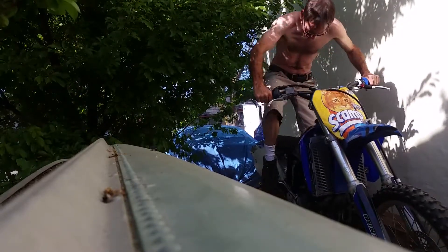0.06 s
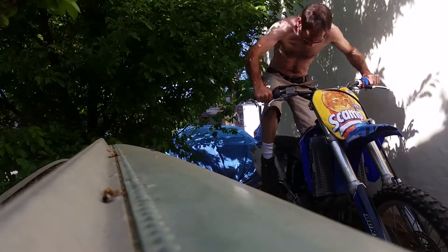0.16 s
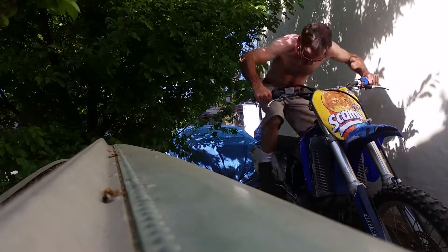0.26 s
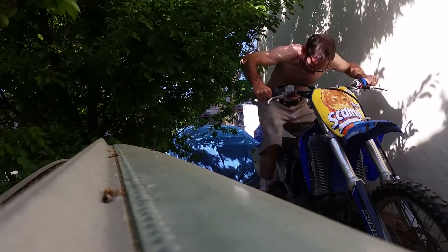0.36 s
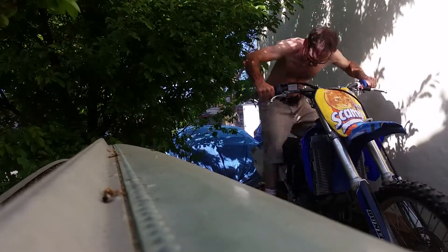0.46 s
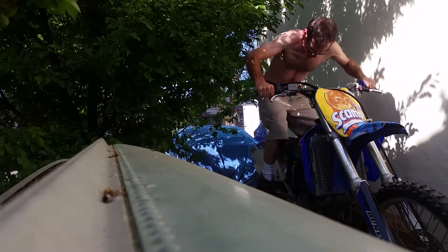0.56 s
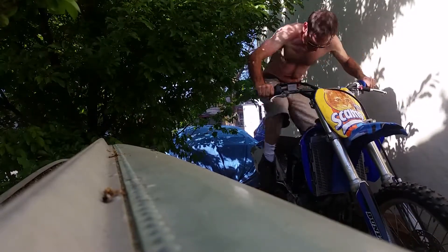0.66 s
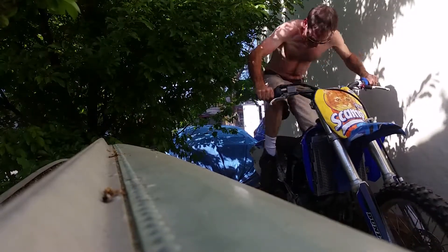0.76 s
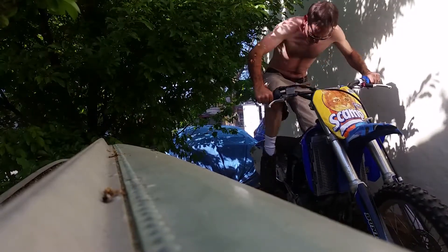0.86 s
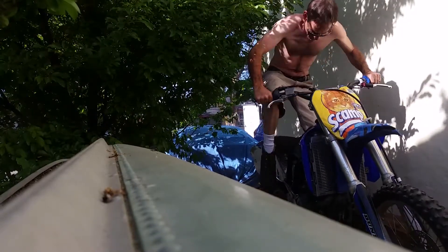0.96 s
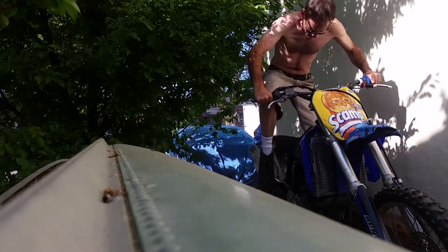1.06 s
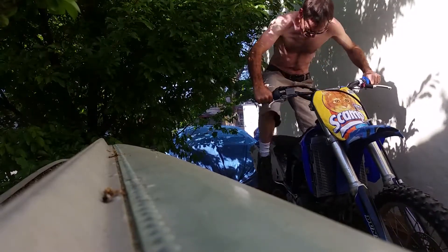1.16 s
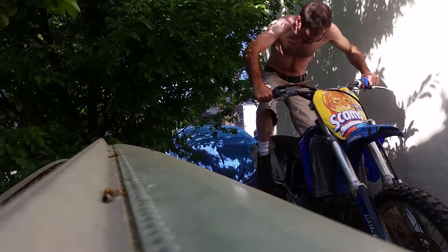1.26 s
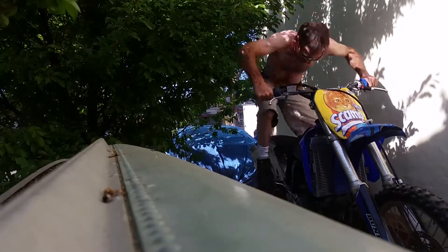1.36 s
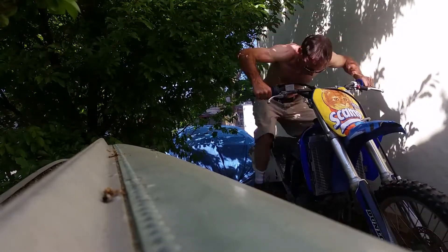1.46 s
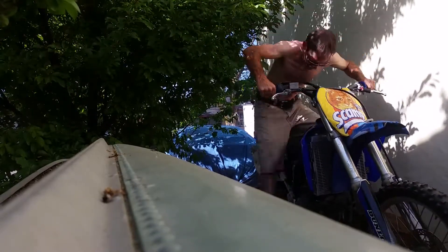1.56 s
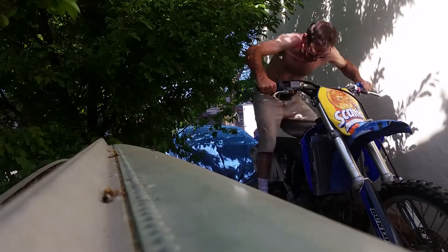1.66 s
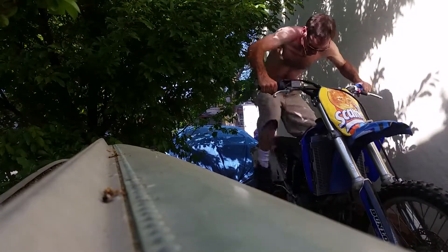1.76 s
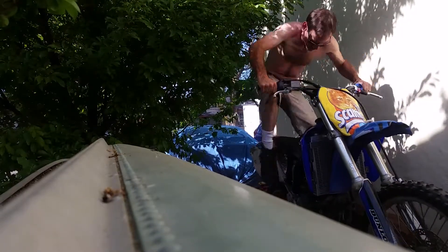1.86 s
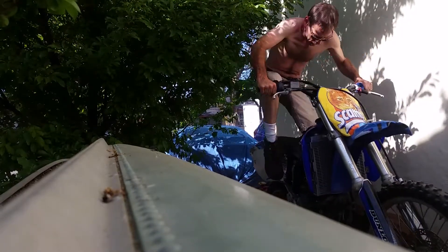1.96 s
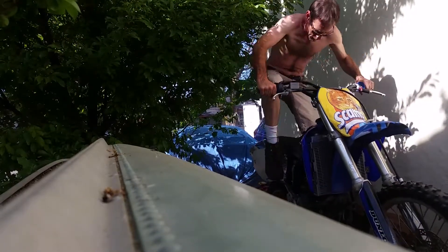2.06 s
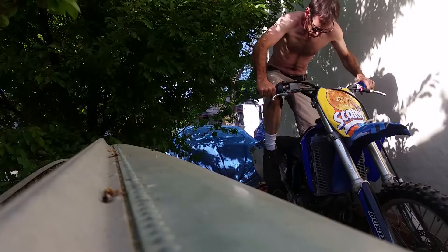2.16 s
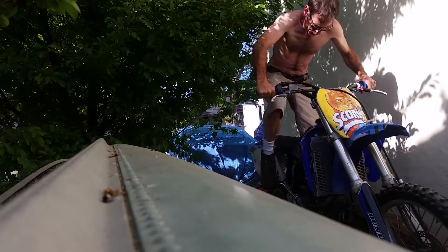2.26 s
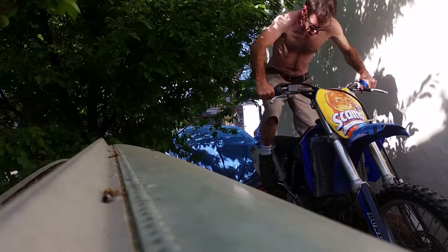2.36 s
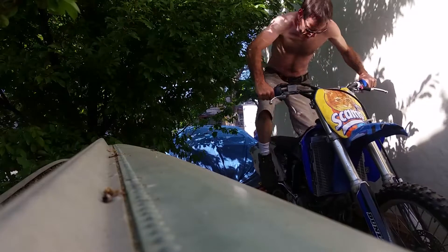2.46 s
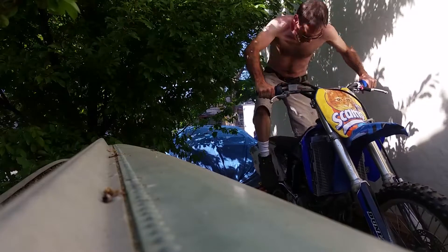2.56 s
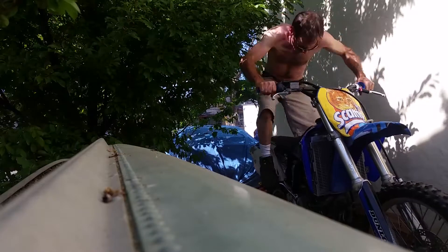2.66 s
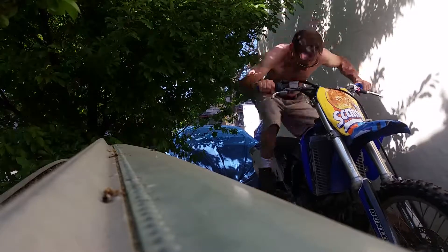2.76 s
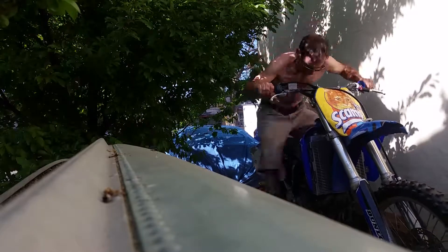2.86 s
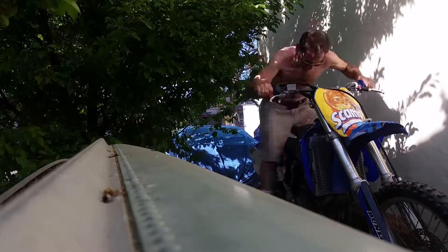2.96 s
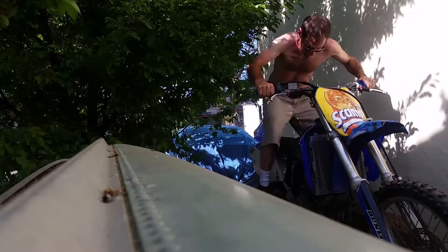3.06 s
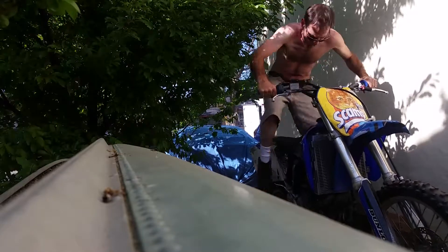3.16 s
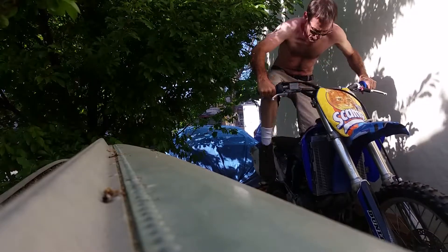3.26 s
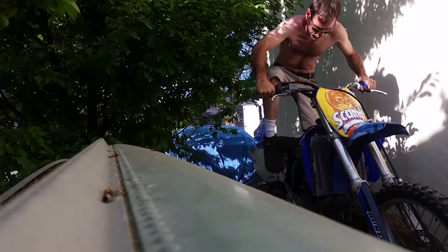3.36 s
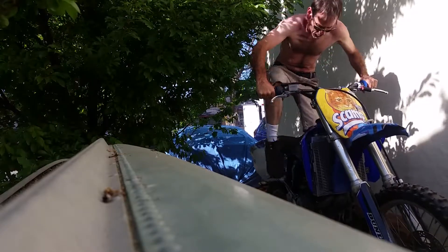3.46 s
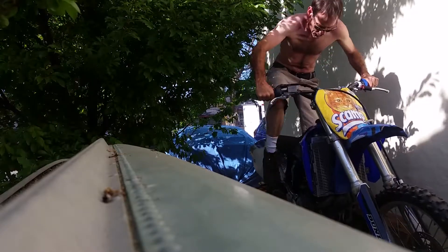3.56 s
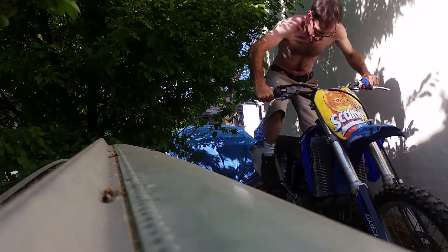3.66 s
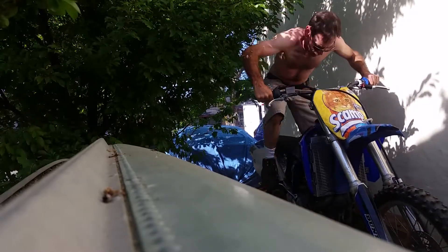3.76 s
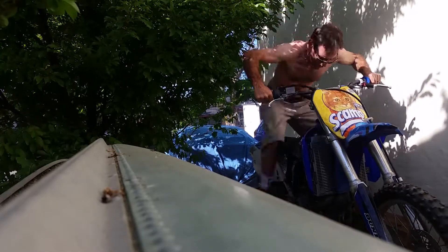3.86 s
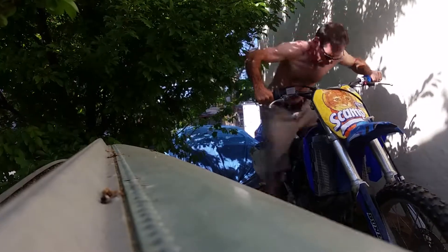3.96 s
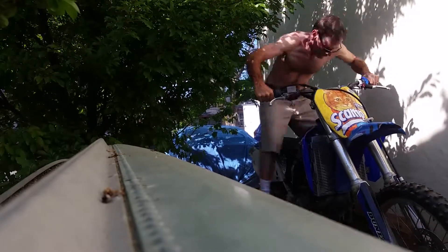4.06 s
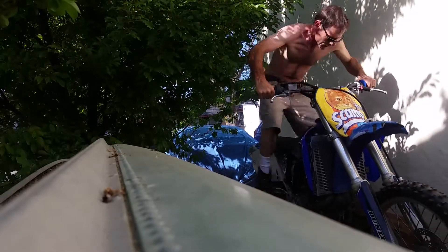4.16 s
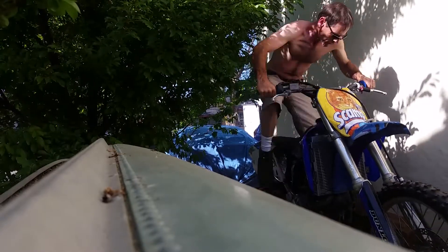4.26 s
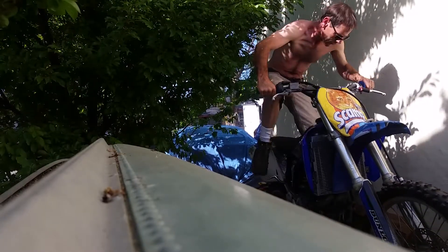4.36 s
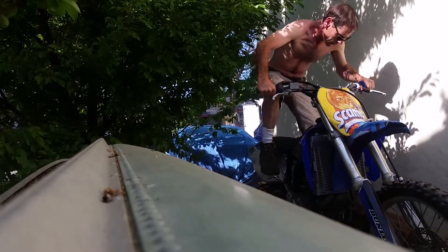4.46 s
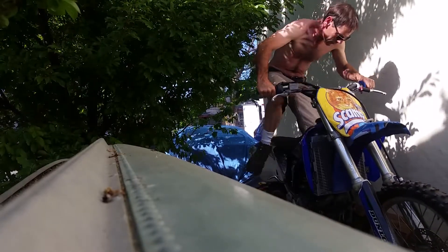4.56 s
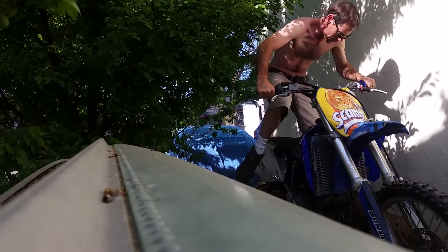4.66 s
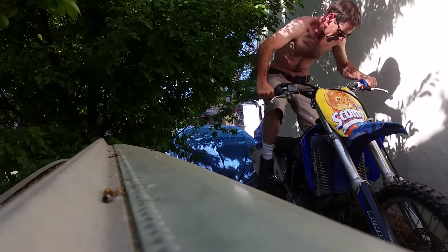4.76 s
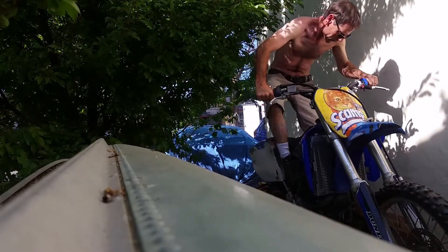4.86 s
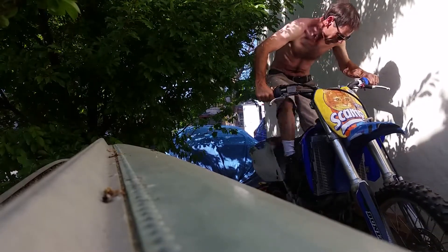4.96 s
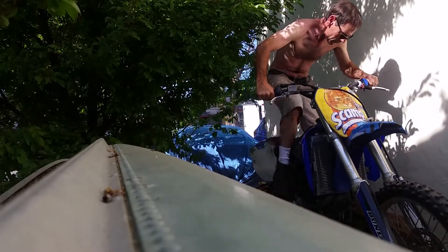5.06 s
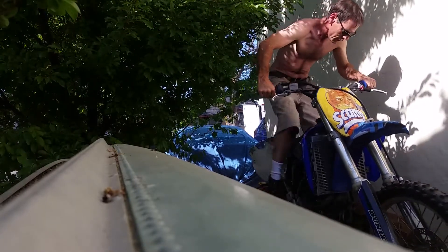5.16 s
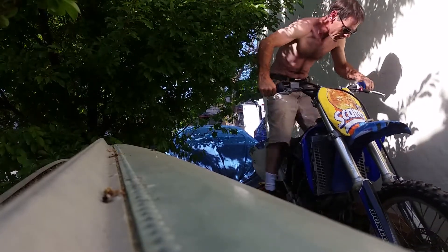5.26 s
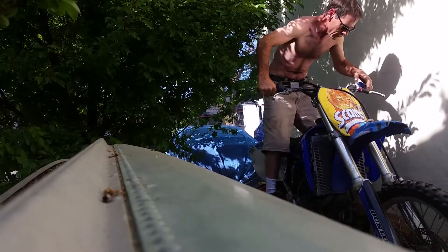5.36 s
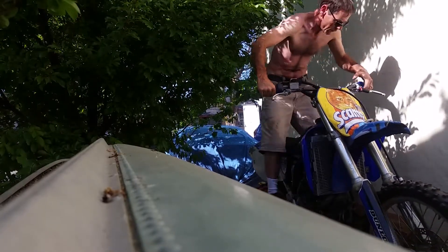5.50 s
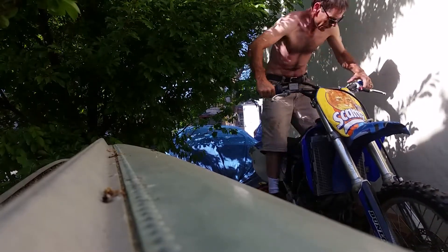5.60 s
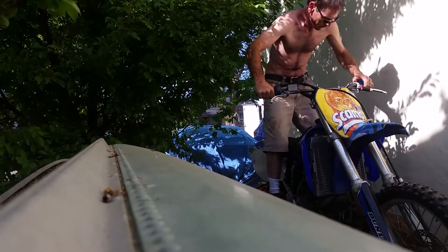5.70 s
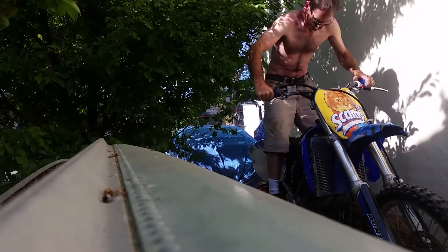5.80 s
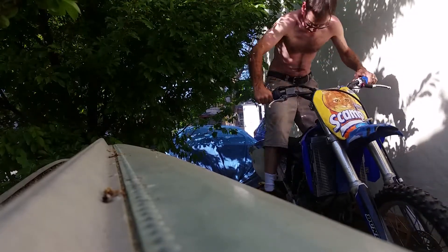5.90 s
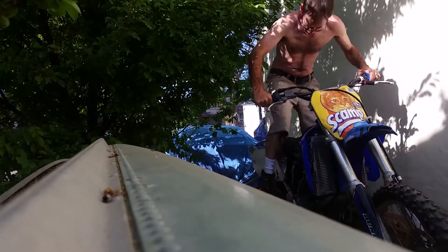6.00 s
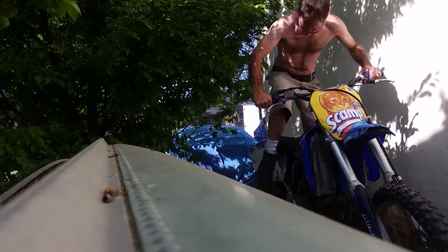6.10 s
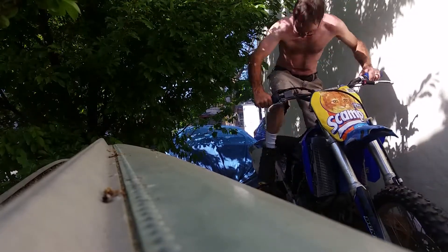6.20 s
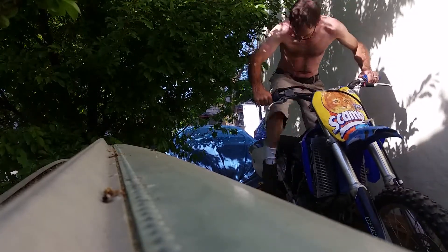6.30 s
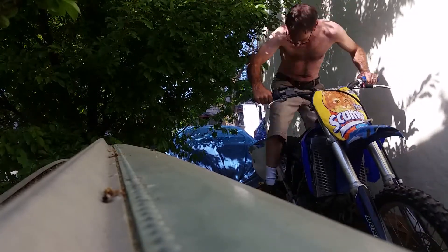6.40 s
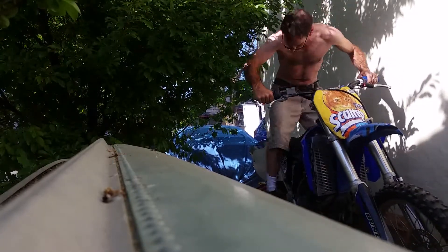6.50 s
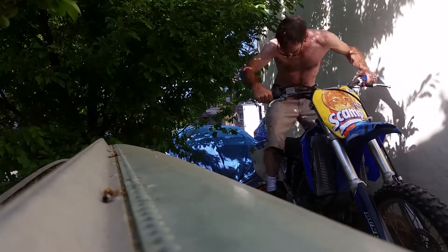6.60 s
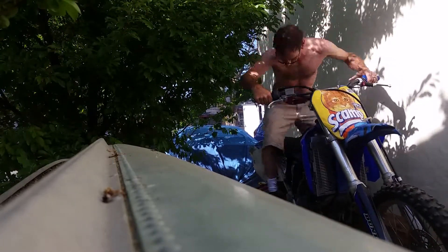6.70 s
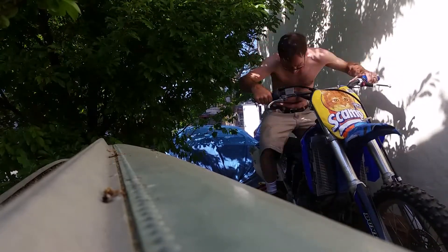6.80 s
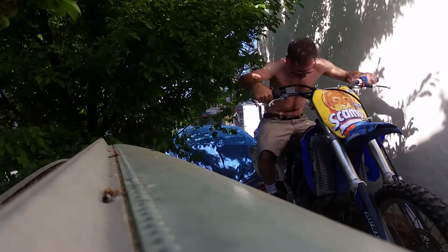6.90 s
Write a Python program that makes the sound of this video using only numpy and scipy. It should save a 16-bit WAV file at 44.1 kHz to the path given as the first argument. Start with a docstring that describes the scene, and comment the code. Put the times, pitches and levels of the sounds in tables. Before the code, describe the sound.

A motorcycle at the right of a leafy yard is kicked over and fails to start. Each kick brings a metallic clack, low hollow exhaust puffs and a short gear whirr, then quick ratchet clicks as the lever returns. The first two strokes are strongest, later ones weaker, and the fifth slips with only a knock. Distant traffic and faint insects fill the gaps. Close stereo microphone, short reflections from a wall.

```python
"""Motorcycle kicked over in a yard

A single-cylinder motorcycle is kicked over four times in a leafy yard and does not start; a fifth try slips.
Each stroke puffs air into the exhaust pipe, which rings low and dies away. Bursts of noise
make the whirr of the starter gears and the ratchet clicks as the lever returns, and ringing tones make the
knocks of boot and lever on the frame. Shaped noise gives far traffic, insects and leaves."""
import sys
import numpy as np
from scipy import signal
from scipy.fft import rfft, irfft, next_fast_len
from scipy.io import wavfile

SR = 44100
rng = np.random.default_rng(int(sys.argv[2]) if len(sys.argv) > 2 else 0)


def digitize_waveform(pressure):
    """Quantize a signal to 16-bit integers and store it at the path in sys.argv[1].

    Rows of a 2-D input are taken as channels; values are limited to [-1, 1].
    """
    field = np.atleast_2d(pressure).T
    bounded = np.clip(field, -1, 1)
    quanta = np.round(bounded * 32767).astype(np.int16)
    wavfile.write(sys.argv[1], SR, quanta)


N = 306048   # length in samples
SIZE = 2 * next_fast_len(N // 2 + 4096)   # FFT length in samples, with room for echoes
HZ = np.arange(1, SIZE // 2 + 2) * SR / SIZE   # FFT grid; starts one step above zero so its log exists


def amp(db):
    """Decibels to gain."""
    return 10 ** (np.asarray(db) / 20)


def rms_one(x):
    """Scale to unit rms."""
    return x / np.sqrt(np.mean(x ** 2) + 1e-20)


def at_hz(points):
    """Read a table on the FFT grid, along a logarithmic pitch axis."""
    hz, value = np.transpose(points)
    return np.interp(np.log(HZ), np.log(hz), value)


def levels(rows):
    """Gains over time from the dB columns of a curve."""
    s, *columns = np.transpose(rows)
    t = np.arange(N) / SR
    return np.array([amp(np.interp(t, s, column)) for column in columns])


def drift(rate):
    """Slow random wander: straight lines between random points, 'rate' points per second."""
    knots = rng.standard_normal(int(N / SR * 60) + 2)
    position = np.arange(N) / SR * np.clip(rate, .1, 59)
    return np.interp(position, np.arange(len(knots)), knots)


def ring(clicks, hz, t60):
    """A resonance: a unit click sets off a sine of starting height 1 that falls 60 dB in t60 seconds."""
    radius = amp(-60 / (t60 * SR))
    turn = 2 * np.pi * hz / SR
    feedback = [1, -2 * radius * np.cos(turn), radius * radius]
    return signal.lfilter([0, np.sin(turn)], feedback, clicks + 1e-18)


def soft(x, cutoff_hz):
    """Round off sudden steps with two equal one-pole low-passes."""
    r = np.exp(-2 * np.pi * cutoff_hz / SR)
    return signal.lfilter([(1 - r) ** 2], [1, -2 * r, r * r], x)


def train(times, gains):
    """Clicks of given heights at given times."""
    out = np.zeros(N)
    np.add.at(out, (np.asarray(times) * SR).astype(int), gains)
    return out


def wide_noise(spectrum, likeness):
    """Stereo noise of rms 1: a shared part and an opposed part set how alike the ears are at each pitch."""
    mid, side = rfft(rng.standard_normal((2, SIZE)))
    alike = np.clip(at_hz(likeness), 0, 1)
    pair = np.sqrt(1 + alike) * mid + np.sqrt(1 - alike) * side * [[1], [-1]]
    return rms_one(irfft(pair * amp(at_hz(spectrum)), SIZE)[:, :N])


def split(x):
    """Separate the sound below and above 6500 Hz, each scaled to rms 1."""
    low = signal.sosfilt(signal.butter(4, 6500, fs=SR, output="sos"), x)
    high = signal.sosfilt(signal.butter(4, 6500, "high", fs=SR, output="sos"), x)
    return rms_one(low), rms_one(high)


def faint_tones(lines, tone_swell, t60):
    """Noise heard through narrow resonances becomes wavering tones."""
    tones = sum(amp(db) * rms_one(ring(rng.standard_normal((2, N)), hz, t60)) for hz, db in lines)
    return levels(tone_swell) * tones


# how loud the yard is over time: t/s, traffic level/dB, insect level/dB
YARD_LEVELS = [(0, -45, -62.5), (.4, -48.5, -66.5), (1.05, -43, -59.5), (1.5, -40.5, -60.5),
               (2.15, -48.5, -70), (2.55, -53.5, -74.5), (2.85, -46.5, -67.5), (3.5, -49.5, -74.5),
               (3.9, -52.5, -78.5), (4.5, -44.5, -72), (4.65, -55, -74), (4.95, -57, -77), (5.15, -49, -64),
               (5.8, -48, -63), (6.45, -50, -64), (6.94, -47, -58.5)]
# noise colours of traffic, insects and leaves: f/Hz, relative level/dB per Hz
TRAFFIC_COLOUR = [(15, -48), (25, -34), (54, -3), (156, -3.5), (252, -10.5), (273, -17.5), (306, -13),
                  (378, -15.5), (409, -15), (567, -16.5), (674, -17.5), (787, -18), (2500, -39.5),
                  (3250, -69.5), (5500, -120)]
INSECT_COLOUR = [(1060, -42), (1800, -3.5), (3160, -14), (4130, 0.5), (5170, -11.5), (5780, -14),
                 (6550, -16.5), (6680, -18.5), (8000, -31.5), (10400, -57), (17600, -120)]
LEAF_COLOUR = [(4710, -47), (8000, -32), (9980, 2.5), (11900, 1), (16100, -6), (16400, -22), (16500, -50)]
# how alike the yard is at the two ears: f/Hz, likeness (below 0 counts as 0)
YARD_LIKENESS = [(60, 0.97), (240, 0.41), (950, 0.13), (3770, -0.57), (15000, -0.8)]
# faint wavering whistles that swell late on and fall away: f/Hz, level/dB before the swell
WHISTLE_TONES = [(5510, -97.5), (6360, -88), (6990, -95), (10600, -86.5), (11640, -97.5)]
# their swell: t/s, added level/dB
WHISTLE_LEVELS = [(4.4, -23), (4.6, -6), (5.3, 9), (6.3, 12.5), (6.6, -9.5)]
# faint wavering tones, strongest early on: f/Hz, level/dB before the swell
SQUEAK_TONES = [(2250, -69.5), (2600, -78)]
# their swell: t/s, added level/dB
SQUEAK_LEVELS = [(0, -1), (.2, 3), (.4, -7), (1.101, 7.5), (1.4, 10), (1.6, -15), (2.1, -30)]
LEAVES_DB = -11.5   # relative to the insects


def yard():
    """Far traffic, insects and leaves are coloured noise; faint tones come from narrow resonances."""
    traffic, insects = levels(YARD_LEVELS)
    rumble = traffic * amp(1.9 * drift(rate=5.0)) * wide_noise(TRAFFIC_COLOUR, YARD_LIKENESS)
    buzz = insects * wide_noise(INSECT_COLOUR, YARD_LIKENESS)
    rustle = insects * amp(LEAVES_DB + 3 * drift(rate=11.0)) * wide_noise(LEAF_COLOUR, YARD_LIKENESS)
    whistles = faint_tones(WHISTLE_TONES, WHISTLE_LEVELS, t60=.15)
    squeaks = faint_tones(SQUEAK_TONES, SQUEAK_LEVELS, t60=0.033)
    return rumble + buzz + rustle + whistles + squeaks


# knocks of boot and lever: t/s, relative level/dB, brightness/dB per octave, favoured f/Hz
KNOCK_EVENTS = [(0.126, -27.5, 1, 1230), (0.14, -34.5, 3.5, 244), (.416, -37.5, 4, 553),
                (.432, -40.5, 7.5, 900), (.598, -13.5, 2.5, 1010), (0.77, -18, -3, 930),
                (0.863, -35, 6, 623), (.959, -31, 4.5, 1000), (1.271, -30.5, 4, 1230),
                (1.32, -34.5, -7.5, 243), (1.508, -27.5, 2.5, 157), (1.665, -27, 7, 754),
                (1.7, -20.5, 5, 571), (1.712, -22, 2.5, 575), (2.314, -30, -2, 303),
                (2.415, -30.5, -4, 557), (2.903, -39.5, 0, 303), (2.939, -18.5, 0, 280),
                (2.958, -11, -1, 300), (2.975, -20.5, 3.5, 570), (3.026, -11.5, -4.5, 590),
                (3.164, -24.5, 9.5, 1610), (3.178, -27.5, 8.5, 1390), (3.241, -36.5, 10, 244),
                (3.399, -36.5, 5, 905), (3.689, -33, 0, 299), (3.764, -28, -0.5, 447), (4.01, -28, 5, 218),
                (4.08, -16.5, 0, 564), (4.189, -27.5, 0, 250), (4.322, -36, 5, 235),
                (4.429, -36, 5.5, 1260), (4.923, -34, -1, 489), (4.938, -32.5, -0.5, 650),
                (4.983, -37, -5, 563), (5.012, -16, 1, 624), (5.022, -12, 0.5, 303),
                (5.065, -19.5, 2, 270.6), (5.2, -30, -7, 323), (5.273, -47, -1, 264),
                (5.422, -32.5, -0.5, 426), (5.938, -37, 4.5, 978), (6.057, -34.5, 3, 940),
                (6.281, -52.5, -12, 252), (6.598, -28.5, 1.5, 957), (6.608, -31.5, 1, 733),
                (6.629, -38, -3.5, 246), (6.711, -41.5, 6, 1800), (6.799, -43, 2, 250)]
# ringing modes of the frame: f/Hz, relative level/dB, t60/s (time to fall 60 dB)
FRAME_MODES = [(142.5, -2, 0.36), (156.5, -2.5, 0.41), (244.4, -5, 0.43), (262.5, -8, 0.19),
               (299.3, -7.5, 0.18), (402, -3, 0.061), (559.4, -5.5, 0.14), (649, -9, 0.093),
               (760, -6, 0.052), (963, -12.5, 0.085), (1096, -12, 0.09), (1420, -17.5, 0.056),
               (1794, -8, 0.03)]


def knocks():
    """Every knock strikes each frame mode with a strength of its own, most near the spot's favoured pitch."""
    s, peak_db, bright_db, spot_hz = np.transpose(KNOCK_EVENTS)
    strength_db = rng.normal(0, 2.2, (len(s), len(FRAME_MODES)))
    out = 0
    for k, (hz, level_db, t60) in enumerate(FRAME_MODES):
        favour_db = 11 * np.exp(-(np.log2(hz / spot_hz) / 0.24) ** 2)
        tone_db = bright_db * np.log2(hz / 250) + favour_db
        gains = amp(peak_db + level_db - 12.5 + tone_db + strength_db[:, k])
        out = out + ring(train(s, gains * (-1) ** k), hz, t60)   # neighbouring modes start in opposite directions
    return out


# noise colour of gears and ratchet: f/Hz, relative level/dB per Hz
METAL_COLOUR = [(710, -29), (1200, -10), (1560, -2.5), (1720, -14), (2150, -0.5), (2450, -5.5),
                (2790, -1.5), (3710, -10.5), (4280, -9.5), (5100, -17), (7410, -27), (10800, -10),
                (15400, -26), (16000, -23.5), (16500, -36)]
# the bike is wide, so its rattles differ at each ear: f/Hz, likeness
BIKE_LIKENESS = [(200, 0.69), (600, 0.62), (2000, 0.079), (10000, 0.24)]
# ringing modes of the lever: f/Hz, relative level/dB, t60/s
LEVER_MODES = [(2150, -10.5, .04), (2730, -12, 0.02), (2760, -9.5, .09), (3327, -11, 0.043),
               (4440, -11.5, 0.098), (8326, -19.5, 0.04), (9990, 2.5, 0.11), (10690, -4.5, 0.055),
               (12100, -14.5, 0.051), (14200, -16, .05)]
# the pawl skips over the ratchet teeth as the lever returns: t/s, relative level/dB
PAWL_CLICKS = [(0.6702, -13), (0.6881, -11.5), (0.7324, -12), (.754, -21), (.7755, -10.5), (0.8052, -9.5),
               (0.8608, -15.5), (1.723, -20), (1.753, -13), (1.7734, -13.5), (1.7925, -11), (1.8148, -11),
               (1.8278, -10.5), (1.8495, -14), (1.878, -17), (1.9164, -15.5), (1.9623, -17), (3.105, -21),
               (3.132, -19.5), (3.163, -13.5), (3.1813, -15.5), (3.2199, -16.5), (3.258, -16.5),
               (3.3034, -18.5), (3.3525, -23.5), (4.148, -20), (4.1768, -18.5), (4.1965, -16),
               (4.2186, -17), (4.24, -18.5), (4.2767, -18.5), (4.3166, -18), (4.35, -16.5), (4.3843, -18.5),
               (4.4166, -24.5)]
# the lever is set, takes up, hits its stop and rattles: t/s, relative level/dB,
# treble below 6500 Hz relative to that above/dB, t60/s (kept within 0.01 to 0.4 s)
LEVER_CLICKS = [(0.081, -53, 3, 0.12), (0.116, -58, 20.5, 0.14), (.157, -50.5, -12, 0.13),
                (0.4736, -30.5, -12, 0.53), (.5415, -31.5, -2.5, 0.47), (0.567, -21, -10, 0.47),
                (.606, -22, 3.5, .28), (0.622, -9, -13.5, 0.47), (0.9554, -48, 8.5, 0.29),
                (1.146, -46.5, 2.5, 0.16), (1.271, -51.5, 16.5, 0.16), (1.444, -55.5, 5, 0.22),
                (1.498, -52.5, 12.5, 0.29), (1.5623, -46.5, 1, 0.25), (1.585, -30, -2, 0.79),
                (1.659, -30, 3.5, 0.11), (1.685, -21.5, -27, 0.049), (1.699, -11.5, -1.5, 0.17),
                (2.3597, -66, 16, .12), (2.4153, -66, 24.5, 0.099), (2.9294, -32.5, -6.5, 0.33),
                (2.9534, -25, -9, 0.21), (2.9948, -23, -29, 0.1), (3.0245, -12.5, -0.5, .15),
                (3.0525, -18, -3.5, 0.43), (3.402, -43, 0.5, 0.17), (3.453, -52.5, -7, 0.28),
                (3.6994, -64, 13, 0.12), (3.7684, -67.5, 24, 0.074), (3.997, -50, 10, 0.43),
                (4.0407, -43.5, -4, 0.13), (4.058, -36, -24, .15), (4.0808, -20, 2, .27),
                (4.445, -53, 7, 0.11), (4.5605, -69, -15, .17), (4.9312, -46.5, -4, 0.13),
                (4.9858, -55, 3, 0.27), (5.01, -20, -4.5, 0.22), (5.062, -28, -5, 0.049),
                (5.4216, -51, -1, .36), (5.938, -47.5, 0, .17), (6.273, -57, -11.5, .12),
                (6.43, -53.5, -12, 0.084), (6.6, -60, 4.5, 0.14), (6.71, -33, 3.5, 0.067),
                (6.8344, -50, -18, 0.15)]
PAWL_LOW_DB, PAWL_RING_DB, CLICK_RING_DB = -6.5, -21, -15   # low treble, then the lever's ring
PAWL_T60_S, PAWL_LAST_T60_S = 0.049, 0.11   # the last tooth of a run rings on
SLACK_RISE_S = 0.00785   # long rattles set in gradually


def ratchet():
    """Each click is a rattling burst of noise that dies away, with a ring of the lever."""
    low, high = split(wide_noise(METAL_COLOUR, BIKE_LIKENESS))
    out = np.zeros((2, N))
    t = np.arange(int(.3 * SR)) / SR
    last = np.diff([s for s, db in PAWL_CLICKS], append=N / SR) > .2   # a long gap follows
    hits = []
    for (s, db), ends_run in zip(PAWL_CLICKS, last):
        t60 = PAWL_LAST_T60_S if ends_run else PAWL_T60_S
        hits.append((s, db, PAWL_LOW_DB, t60, PAWL_RING_DB))
    hits += [(*row, CLICK_RING_DB) for row in LEVER_CLICKS]

    for s, peak_db, low_db, t60, ring_db in hits:
        at = int(s * SR)
        part = slice(at, min(N, at + len(t)))
        fade = amp(peak_db - 10.5 - 60 * t / np.clip(t60, .01, .4))
        fade = fade * (1 + 0.42 * np.exp(-t / 0.00041))   # a crack leads
        if t60 > .3:
            fade = fade * (1 - np.exp(-t / SLACK_RISE_S))
        out[:, part] += fade[:N - at] * (high[:, part] + amp(low_db) * low[:, part])

    s, peak_db, low_db, _, ring_db = np.transpose(hits)
    strength_db = rng.normal(0, 2.4, (len(s), len(LEVER_MODES)))
    for k, (hz, level_db, t60) in enumerate(LEVER_MODES):
        treble_db = (hz < 6500) * low_db
        gains = amp(peak_db + ring_db + level_db + treble_db + strength_db[:, k])
        out += ring(train(s, gains), hz, t60)
    return out


def swell(at_s, hold_s, level_db, rise_db_per_s, fall_db_per_s):
    """Summed gains that rise to a level by at_s, hold and fall, one per kick."""
    t = np.arange(0, N + 64, 64)[:, None] / SR   # every 64 samples is fine enough
    before_db = rise_db_per_s * (at_s - t)
    after_db = fall_db_per_s * (t - at_s - hold_s)
    under_db = np.maximum(0, np.maximum(before_db, after_db))
    return np.interp(np.arange(N) / SR, t[:, 0], amp(level_db - under_db).sum(axis=1))


# the kicks: piston push t/s, its hold/s, casing rumble relative level/dB, air rush relative level/dB,
# gears at speed t/s, their hold/s, grind relative level/dB, whirr relative level/dB
KICK_EVENTS = [(0.542, 0.19, -28.5, -32, 0.7, 0.063, -34.5, -28.5),
               (1.634, 0.085, -28, -30.5, 1.892, 0.027, -47.5, -38.5),
               (2.966, 0.16, -29.5, -36, 3.2, 0.069, -49.5, -43.5),
               (4.032, .12, -35, -45, 4.19, 0.18, -52, -49),
               (5.041, 0.0077, -38, -45, 4.59, 0.0092, -72, -71)]
PUSH_RISE_DB_PER_S, PUSH_FALL_DB_PER_S = 175, 87.5
RUSH_LATE_S, RUSH_FALL_DB_PER_S = 0.031, 60.5   # the air follows the piston
SPIN_RISE_DB_PER_S, SPIN_FALL_DB_PER_S, GRIND_RISE_DB_PER_S = 166, 186.5, 121.5


def turning():
    """Each kick pushes the piston and spins the gears: gains for air rush, rumble, grind and whirr."""
    (push_s, push_hold_s, rumble_db, rush_db,
     spin_s, spin_hold_s, grind_db, whirr_db) = np.transpose(KICK_EVENTS)
    rush = swell(push_s + RUSH_LATE_S, push_hold_s, rush_db, PUSH_RISE_DB_PER_S, RUSH_FALL_DB_PER_S)
    rumble = swell(push_s, push_hold_s, rumble_db, PUSH_RISE_DB_PER_S, PUSH_FALL_DB_PER_S)
    grind = swell(spin_s, spin_hold_s, grind_db, GRIND_RISE_DB_PER_S, SPIN_FALL_DB_PER_S)
    whirr = swell(spin_s, spin_hold_s, whirr_db, SPIN_RISE_DB_PER_S, SPIN_FALL_DB_PER_S)
    return rush, rumble, grind, whirr


# noise colour of the casing: f/Hz, relative level/dB per Hz
CASING_COLOUR = [(100, -33.5), (170, -1.5), (201, -13), (243, -2), (401, -9.5), (573, -10), (842, -15),
                 (1290, -20.5), (1540, -25.5), (1800, -26), (2340, -41.5), (3960, -120)]
TEETH_PER_S = 630   # tooth contacts, on average
SCRAPE_DB = -25.5   # the lever grinds while it pushes, relative to the rumble


def gears(rumble, grind, whirr):
    """Uneven tooth contacts gate the noise and ring the lever; the casing rumbles in surges."""
    contact = rng.random(N) < TEETH_PER_S / SR
    teeth = contact * amp(3.5 * np.minimum(rng.exponential(1, N), 3))
    bursts = 0.35 + rms_one(signal.lfilter([1], [1, -amp(-60 / (0.046 * SR))], teeth))   # t60 0.046 s each
    casing = wide_noise(CASING_COLOUR, BIKE_LIKENESS) * amp(2.5 * drift(rate=28.0))
    low, high = split(wide_noise(METAL_COLOUR, BIKE_LIKENESS))
    clatter = 0
    for hz, db, t60 in LEVER_MODES:
        if hz < 6500:
            clatter = clatter + amp(db) * ring(teeth * rng.standard_normal(N), hz, t60)
    scrape = amp(SCRAPE_DB) * rumble
    metal = bursts * ((grind + scrape) * low + whirr * high)
    return amp(-2.5) * rumble * casing + metal + grind * rms_one(clatter)


# exhaust puffs: t/s, relative level/dB, upper pipe modes relative level/dB, t60 of the lowest mode/s
EXHAUST_PUFFS = [(0.4848, -4, 0, 1.7), (0.581, -10, 3.5, 0.62), (0.632, -9, 4.5, 0.57),
                 (0.679, -16.5, 0.5, .7), (0.719, -4.5, -6, 0.53), (0.747, -14.5, -2, 0.42),
                 (1.595, -4, 2.5, 1.5), (1.645, -7.5, 2.5, .9), (1.686, -8.5, 2.5, .9),
                 (1.7386, -4, 0.5, .3), (2.941, -16, 0.5, 0.67), (2.972, -11, 5.5, 0.42),
                 (2.985, -9.5, 2.5, 0.57), (3.004, -8, 5, 0.21), (3.05, -15, -1.5, 0.61),
                 (3.085, -16, 0, .5), (3.142, -7.5, -3.5, 0.22), (4.017, -16, 1, 1.2),
                 (4.06, -13.5, 0, 1.4), (4.088, -4, -16, 0.34), (4.105, -11, 1.5, .4)]
# ringing modes of the pipe: f/Hz, relative level/dB, share of the t60
PIPE_MODES = [(62.5, 0, 1.0), (125, 0, .85), (90, -1.5, .16)]


def exhaust(rush):
    """Each puff sets the pipe ringing afresh; turbulent air keeps its modes stirring."""
    puffs = np.zeros(N)
    t = np.arange(SR // 2) / SR
    next_puffs = [row[0] for row in EXHAUST_PUFFS[1:]] + [N / SR]
    for (s, peak_db, upper_db, t60), after in zip(EXHAUST_PUFFS, next_puffs):
        at = int(s * SR)
        cut = amp(-60 * np.maximum(t - (after - s), 0) / 0.063)   # the port opens again and kills the old ring
        for k, (hz, level_db, share) in enumerate(PIPE_MODES):
            mode_db = peak_db + level_db - 3.5 + (k > 0) * upper_db
            fade = amp(mode_db - 60 * t / (share * t60))
            puffs[at:at + len(t)] -= cut * fade * np.sin(2 * np.pi * hz * t)   # suction comes first

    white = rng.standard_normal(N)
    air = 0
    for hz, level_db, share in PIPE_MODES:
        air = air + amp(level_db) * ring(white, hz, 0.14 * share)
    high_pass = signal.butter(3, 46, "high", fs=SR, output="sos")
    pulses = signal.sosfilt(high_pass, soft(puffs, cutoff_hz=160))
    return pulses + amp(-5) * rush * rms_one(air)


# tone balance of the direct and scattered sound: f/Hz, left minus right level/dB
SIDE_TILT = [(60, 2.5), (99, -11), (160, 12.5), (270, 9.5), (450, 0), (740, -1.5), (1220, -4.5),
             (2010, -3.5), (3330, -0.5), (5500, 10), (9080, -7), (15000, -14.5)]
# scatter off wall and foliage: f/Hz, level relative to the direct sound/dB
SCATTER_LEVELS = [(50, -29), (130, -13), (300, -14), (1000, -7), (4000, -7), (12000, -12)]
LEFT_LAG_S, ECHO_T60_S = 12 / 44100, 0.13


def placed(x):
    """The bike stands to the right: left hears it later and coloured otherwise; scatter differs per side."""
    tilt_db = at_hz(SIDE_TILT) / 2
    t = np.arange(SR // 2) / SR
    tails = rng.standard_normal((2, len(t))) * amp(-60 * t / ECHO_T60_S) * (t > .003)
    tails = tails / np.sqrt(np.sum(tails ** 2, axis=1, keepdims=True))
    scatter = rfft(tails, SIZE) * amp(at_hz(SCATTER_LEVELS))
    direct = np.array([np.exp(-2j * np.pi * HZ * LEFT_LAG_S), np.ones(len(HZ))])
    path = (direct + scatter) * amp([tilt_db, -tilt_db])
    return irfft(rfft(x, SIZE) * path, SIZE)[:, :N]


def scene():
    """The bike's sounds are placed in the yard, whose own sounds are added."""
    rush, rumble, grind, whirr = turning()
    bike = knocks() + ratchet() + gears(rumble, grind, whirr) + exhaust(rush)
    return yard() + placed(bike)


CUTOFF_HZ = 16700   # 70 dB down from here up


def record(dry):
    """The highest peaks are rounded and the top is cut steeply."""
    rounded = 1.2 * np.tanh(dry / 1.2)
    return signal.sosfilt(signal.cheby2(14, 70, CUTOFF_HZ, fs=SR, output="sos"), rounded)


dry = scene()
out = record(dry)
digitize_waveform(out)
```